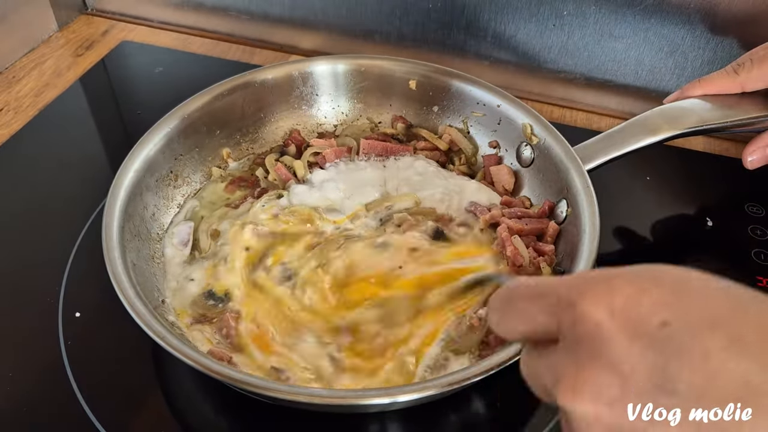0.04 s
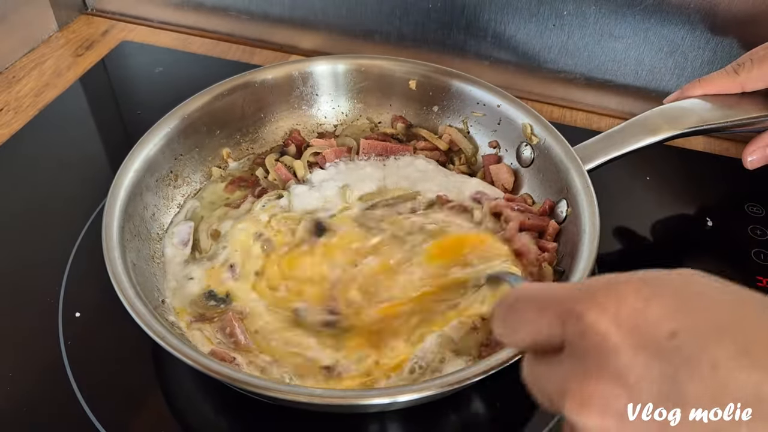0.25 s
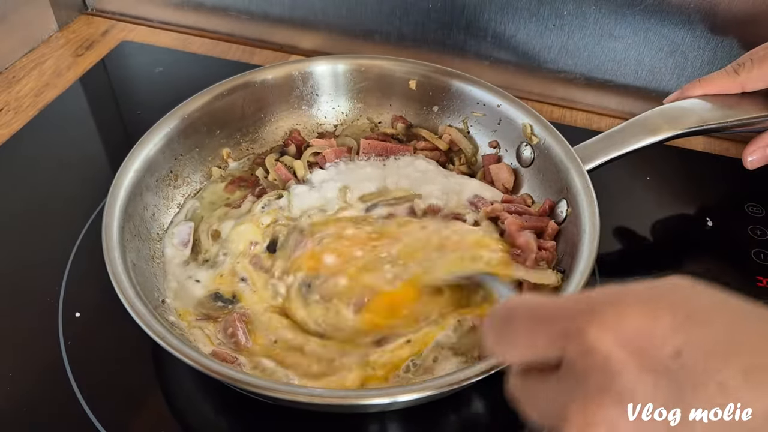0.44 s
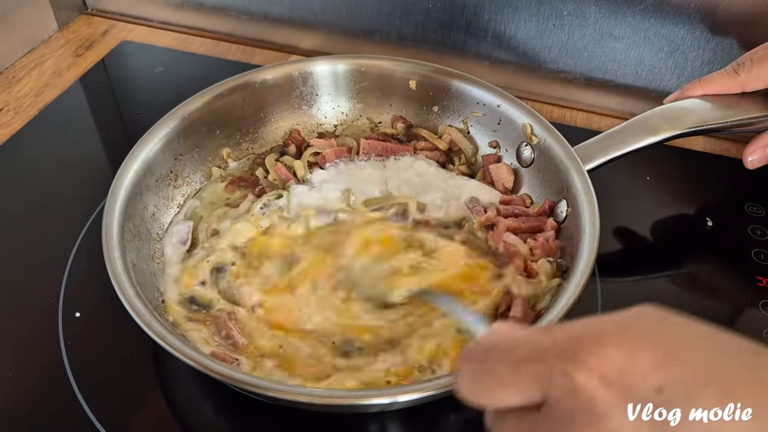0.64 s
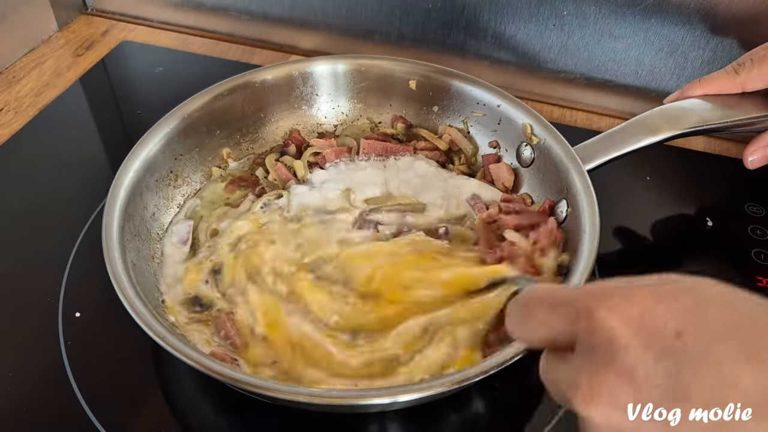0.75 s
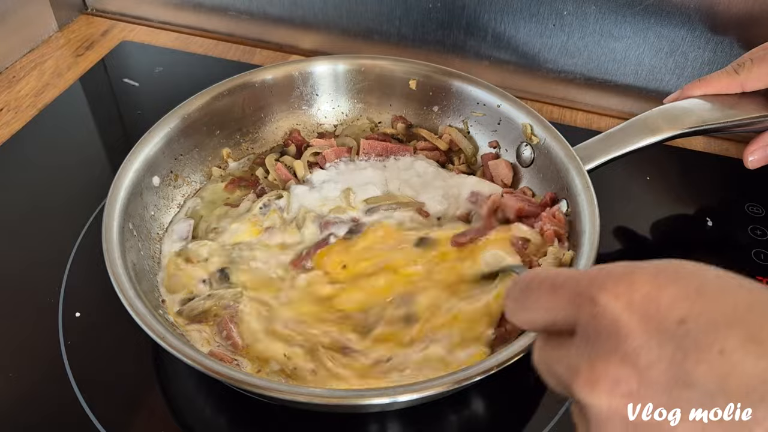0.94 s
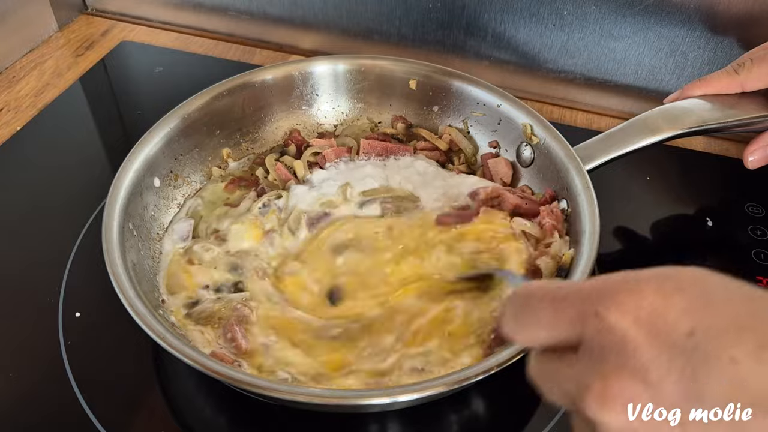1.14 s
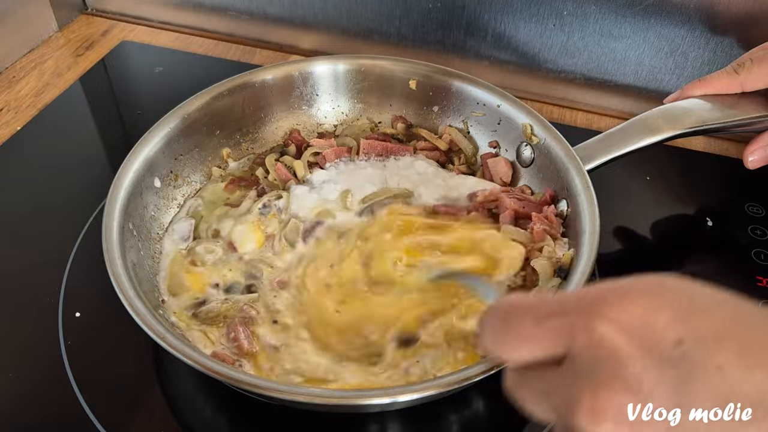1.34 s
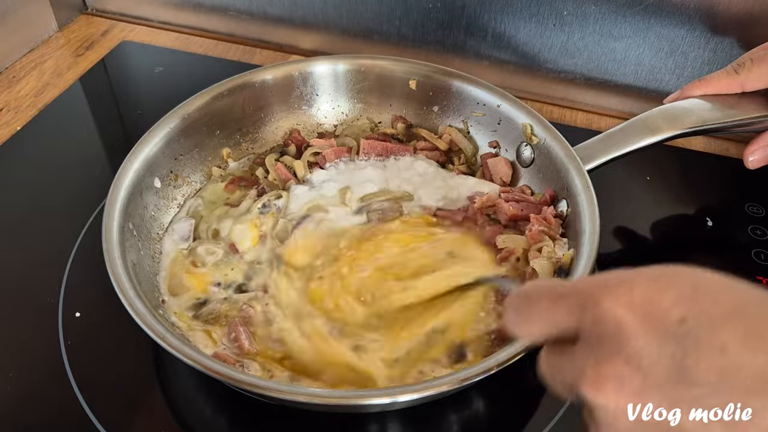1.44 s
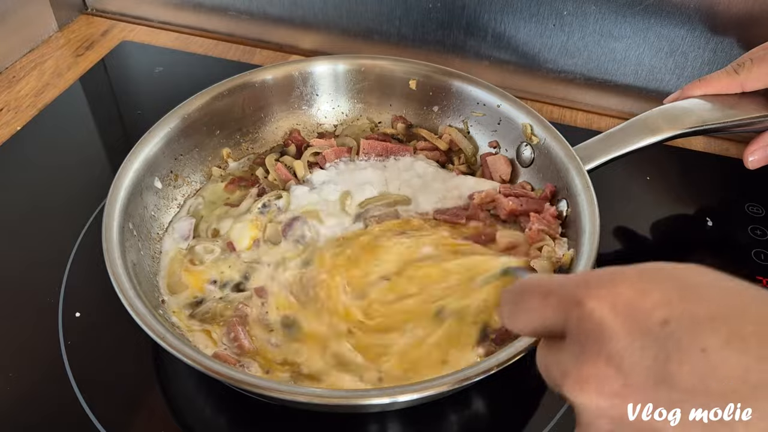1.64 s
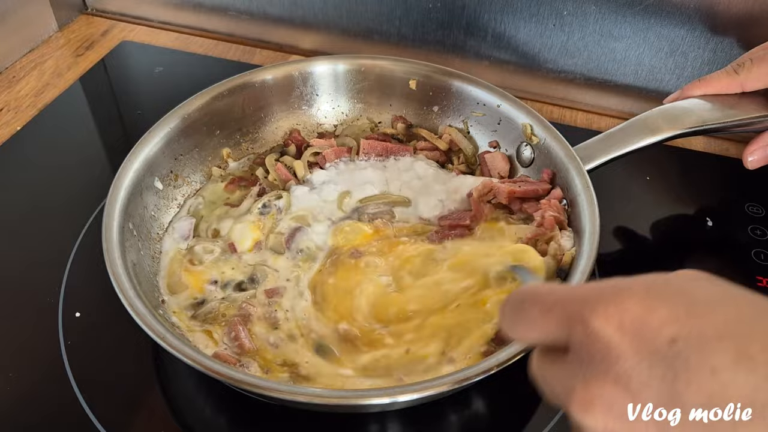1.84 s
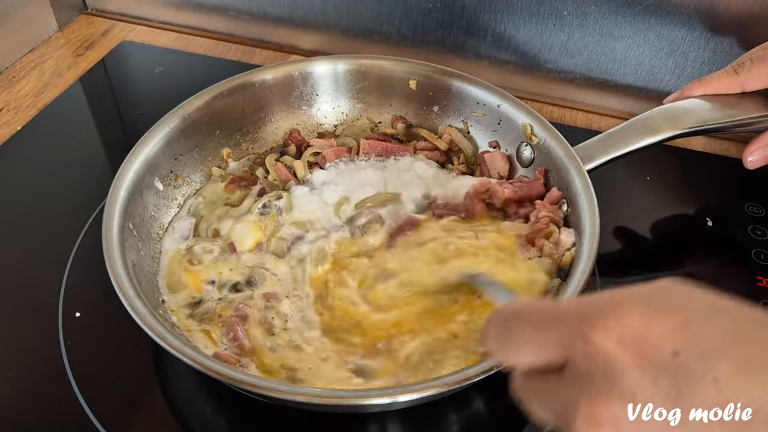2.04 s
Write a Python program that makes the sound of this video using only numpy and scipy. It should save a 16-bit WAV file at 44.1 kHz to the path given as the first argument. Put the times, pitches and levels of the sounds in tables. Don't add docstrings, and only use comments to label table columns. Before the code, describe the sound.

A fork beats eggs in a steel frying pan, heard close in a lightly reverberant kitchen with soft low hum. A fading scrape, ticks and a plop lead to a weak tap at 0.2 s. From 0.4 s, sharp metallic clacks come about every 0.18 s, each with short pan ring, dull thump, wet rasp and rising swish. Small plops and ticks fill gaps; the last stroke near 2 s is softer.

```python
import sys
import numpy as np
from scipy import signal
from scipy.fft import rfft, irfft
from scipy.io import wavfile
from scipy.ndimage import uniform_filter1d

SR = 44100
rng = np.random.default_rng(int(sys.argv[2]) if len(sys.argv) > 2 else 0)


def volts_from_db(level):
    exponent = np.asarray(level, float) / 20
    return 10 ** exponent


def inscribe(sig):
    pcm = np.round(np.clip(np.atleast_2d(sig).T, -1, 1) * 32767)
    wavfile.write(sys.argv[1], SR, pcm.astype(np.int16))


N = 92610

# pitch_hz, level_db
HUM_SPECTRUM = [(15, -64), (25, 5), (114, 3.5), (503, -26.5), (936, -17), (1190, -16), (2220, -15),
                (9320, -32.5), (16000, -59)]
# pitch_hz, likeness_0_to_1
HUM_LIKENESS = [(60, 0.96), (400, 0.39), (2000, 0.062), (12000, 0.57)]
# start_s, drag_db, lift_delay_s, lift_db, fizz_db
DRAGS = [(0.0, -57.5, 0.04, -65, -60), (.195, -60.5, 0.0036, -50.5, -60.5),
         (.396, -37.5, 0.035, -41, -37.5), (.575, -41.5, 0.015, -72, -35), (.753, -38, 0.018, -41, -39),
         (.916, -32.5, 0.04, -46, -37), (1.1, -36.5, 0.034, -37, -37), (1.282, -38.5, 0.041, -45, -37.5),
         (1.457, -39, 0.04, -57, -36.5), (1.631, -38.5, 0.047, -56, -42), (1.806, -36, 0.037, -51.5, -43),
         (1.983, -43.5, 0.029, -45, -63)]
# pitch_hz, level_db
RASP_SPECTRUM = [(900, -33), (1700, -16.5), (2300, -1), (5500, 1), (6500, -26), (9000, -22)]
# pitch_hz, level_db
FIZZ_SPECTRUM = [(3000, -26), (6500, 4), (10500, -3.5), (12500, -8.5), (16000, -9)]
# pitch_hz, level_db, t60_s
PAN_MODES = [(2274, 4, 0.12), (2346, -8.5, 0.12), (2490, -83, 0.0087), (2600, -19, 0.042), (2850, -4, 0.15),
             (3193, -6.5, 0.15), (4096, -1.5, 0.016), (4510, -2, 0.078), (4490, 0, 0.11),
             (4720, 5.5, 0.049), (5094, -5.5, 0.05), (6350, -7, 0.03), (7940, -20, 0.028),
             (11950, -20, 0.07)]
# start_s, thump_db, sway_db, sway_length_s
SHAKES = [(0.031, -35, -38, 0.1), (0.206, -28.5, -32.5, 0.073), (0.398, -27, -41, 0.17),
          (0.575, -29, -46, 0.23), (0.752, -35.5, -56, 0.032), (0.911, -29, -41, 0.14),
          (1.099, -29, -44.5, 0.23), (1.279, -31, -49.5, 0.32), (1.457, -28, -42, 0.064),
          (1.634, -34, -48.5, 0.12), (1.807, -35, -50.5, 0.1), (1.985, -40, -49, 0.041)]
# start_s, peak_db, centre_hz
TICKS = [(.102, -45, 6900), (.245, -52.5, 12000), (.281, -52.5, 9100), (.301, -53.5, 7100),
         (.335, -45, 3070), (.37, -42, 11000), (.386, -33.5, 7300), (.712, -42, 11800), (.841, -59, 4030),
         (.893, -29, 5150), (1.076, -33.5, 5200), (1.673, -44, 4840), (2.04, -48.5, 7450),
         (2.081, -44.5, 4940)]
# start_s, peak_db, pitch_hz
PLOPS = [(.116, -38, 1480), (.322, -31.5, 1420), (.322, -37, 457), (.496, -33, 1490), (.497, -38, 406),
         (.599, -27.5, 2007), (.672, -41.5, 1580), (.686, -52, 2240), (.707, -39.5, 2000),
         (1.208, -45, 1515), (1.402, -44.5, 1380), (1.586, -42.5, 1490), (.841, -29.5, 2080),
         (.893, -30.5, 1483), (1.253, -40.5, 1500), (1.753, -28, 3580), (2.082, -39, 2170)]
# start_s, peak_db, treble_db, low_mode_db
STRIKES = [(0.1905, -32, -14, 2.5), (0.3947, -7.5, -6, -9.5), (0.5734, -9, 3, -6), (0.7508, -12, -2, -6),
           (0.913, -6, -1, 1), (1.0982, -4, -7, -0.5), (1.28, -11.5, 3, 3.5), (1.455, -9, 1.5, 1.5),
           (1.6299, -12.5, 4.5, 3), (1.8047, -11, -3.5, 2.5), (1.9822, -18, -15, 6)]
# pitch_hz, level_db
CRACK_SPECTRUM = [(180, -117), (300, -39), (1580, 5), (2140, 21.5), (4590, 14), (12100, -19),
                  (16000, -19.5)]
# start_s, peak_db, pitch_hz, t60_s
BONKS = [(0.198, -5, 815, 0.01), (0.261, -29, 850, 0.04), (0.395, -17.5, 751, 0.036),
         (0.574, -37, 585, 0.094), (0.661, -29, 760, 0.033), (0.674, -32, 790, 0.028),
         (1.39, -34, 793, 0.059), (0.731, -35.5, 729, 0.094), (0.752, -19, 802, 0.045),
         (0.876, -30.5, 916, 0.083), (0.916, -7, 911, 0.046), (1.07, -27.5, 773, 0.075),
         (1.099, -17, 807, 0.027), (1.281, -23.5, 794.5, 0.055), (1.391, -39, 1004, 0.14),
         (1.457, -15.5, 857, 0.032), (1.585, -46, 754, 0.1), (1.631, -16, 903, 0.04),
         (1.806, -22, 783, 0.042), (1.829, -32, 994, 0.079), (1.985, -23, 925, 0.03),
         (2.086, -46, 940, 0.084)]
# start_s, peak_db, pitch_hz
CLANKS = [(.396, -14, 2990), (.396, -11, 4010), (.396, -19, 4880), (.397, -17, 4730), (.396, -23, 6450),
          (.5745, -18, 4720), (.5745, -23, 5200), (.578, -13, 5440), (.578, -14, 4570),
          (.7515, -12.5, 4670), (.7515, -31, 5100), (.7515, -22, 4000), (.9145, -10, 2168),
          (.9145, -11, 2887), (.9145, -11.5, 4650), (1.0995, -10, 2140), (1.0995, -20, 4630),
          (1.0995, -45, 2900), (1.0995, -35, 4170), (1.0995, -31, 5440), (1.0995, -23, 11800),
          (1.2815, -15.5, 2260), (1.2815, -23, 3037), (1.2815, -15.5, 4050), (1.282, -10, 4540),
          (1.282, -24, 4330), (.915, -21, 1895), (1.983, -33, 3900), (1.2815, -15, 5320),
          (1.4565, -18.5, 2267), (1.4565, -23, 2943), (1.4565, -19, 3900), (1.4565, -23, 4250),
          (1.4565, -26.5, 3230), (.263, -39.5, 543), (1.4565, -23, 4600), (1.6305, -13, 2215),
          (1.6305, -15, 4680), (1.6305, -14.5, 3210), (1.6305, -17, 3895), (1.806, -21, 2204),
          (1.806, -14, 3086), (1.806, -22, 4320), (1.806, -24, 4830), (1.806, -20.5, 4930)]
# middle_s, level_db, centre_hz, half_length_s
CATCHES = [
    (.44, -52, 4700, 0.0071),
    (.64, -46, 5160, 0.0059),
    (.79, -49, 5200, .01),
    (1.14, -42, 4600, 0.0061),
    (1.32, -41, 5130, 0.0087),
    (1.485, -41, 4800, 0.011),
    (1.675, -31, 4900, .0015),
    (1.685, -40, 5000, 0.0074),
    (1.85, -47, 4220, 0.0094),
    (2.02, -46, 5140, 0.0097),
]

HUM_DB = -52
DRAG_T60_S, LINGER_DB, LINGER_T60_S = 0.2, -5, 0.74
LIFT_RISE_S, LIFT_FALL_S = 0.013, 0.012
SWISH_FROM_HZ, SWISH_TO_HZ, SWISH_WIDTH_HZ, SWISH_DB = 3600, 8000, 600, -1
FIZZ_PAST_S, FIZZ_EDGE_S, FIZZ_REST_DB, FROTH_DB = 0.027, 0.0047, -10.5, 0
SLIPS_PER_S, SLIP_SPREAD_DB = 6600, 3.5
SLIP_DETUNE, SLIP_T60_S, RASP_RING_DB = .02, .035, -6
RASP_BOWL_DB, BOWL_HZ = -11, 878
MODE_SCATTER_DB, MODE_DETUNE, DAMPED_T60_S = 2.5, .012, .035
ROOM_DB, ROOM_T60_S, ROOM_TREBLE_HZ = -15.5, 0.29, 6400
THUMP_HZ, THUMP_T60_S, SWAY_HZ = 109, .05, 46.55
TICK_T60_S = 0.07
PLOP_CYCLES, PUFF_WIDTH, PUFF_DB = 67, .35, -1
CRACK_DB, CRACK_T60_S, THIN_HZ = 3, .032, 1950
CLANK_T60_S, CLANK_RISE_S = 0.026, 0.00084
CATCH_WIDTH_HZ = 700
SPREAD_DB, LEFT_DB, LEFT_LAG_S = -3, 2.2, -.00008
EDGE_HZ = 15950


def evened(x):
    return x / np.sqrt(np.mean(x ** 2) + 1e-20)


def read(points, hz):
    f, value = np.transpose(points)
    return np.interp(np.log(hz + 1), np.log(f + 1), value)


def add(mix, start_s, sound):
    part = mix[max(round(start_s * SR), 0):][:len(sound)]
    part += sound[:len(part)]


def colour(x, points, treble_db=0):
    hz = np.fft.rfftfreq(len(x), 1 / SR)
    shelf_db = treble_db / (1 + (6500 / (hz + 1)) ** 4)
    return irfft(rfft(x) * volts_from_db(read(points, hz) + shelf_db), len(x))


def resonate(x, hz, width_hz):
    turn = np.exp(2j * np.pi * np.cumsum(hz * np.ones(len(x))) / SR)
    r = np.exp(-np.pi * width_hz / SR)
    return 2 * (turn * signal.lfilter([1 - r], [1, -r], x / turn)).real


def ring(t, hz, db, t60_s, rise_s=.0004):
    return volts_from_db(db - 60 * t / t60_s) * (1 - np.exp(-t / rise_s)) * np.sin(2 * np.pi * hz * t)


def hum():
    frames, hz = N // 256 + 5, np.fft.rfftfreq(1024, 1 / SR)
    a, b, c, d, patches = rng.standard_normal((frames, 513, 5)).T
    patches = evened(uniform_filter1d(uniform_filter1d(patches, 14, 0), 8, 1))
    same = np.clip(read(HUM_LIKENESS, hz), -1, 1)[:, None]
    left = a + 1j * b
    right = same * left + np.sqrt(1 - same ** 2) * (c + 1j * d)
    z = np.array([left, right]) * volts_from_db(read(HUM_SPECTRUM, hz)[:, None] + 3.8 * patches)
    return volts_from_db(HUM_DB) * evened(signal.istft(z, nperseg=1024, noverlap=768)[1][:, :N])


def slips(size):
    luck = rng.random((4, size))
    clumps = volts_from_db(3.3 * evened(uniform_filter1d(luck[3] - .5, size=300)))
    clicks = (luck[0] < SLIPS_PER_S / SR) * np.sign(luck[1] - .5)
    return evened(clumps * clicks * volts_from_db(-SLIP_SPREAD_DB * np.log(luck[2] + 0.18)))


def steel(treble_db, low_db=0, detune=MODE_DETUNE, longest_s=DAMPED_T60_S):
    t, out = np.arange(6000) / SR, np.zeros(6000)
    luck = rng.standard_normal((len(PAN_MODES), 2))
    for (hz, db, t60_s), (a, b) in zip(PAN_MODES, luck):
        level_db = db + MODE_SCATTER_DB * a + treble_db * (hz > 6500) + low_db * (hz < 3500)
        out += ring(t, hz * (1 + detune * b), level_db, min(t60_s, longest_s), .0001)
    return out


def drag(start_s, drag_db, delay_s, lift_db, fizz_db):
    n = 14000
    t = np.arange(n) / SR
    late = t - delay_s
    lift = volts_from_db(lift_db) * np.exp(-.5 * (late / np.where(late < 0, LIFT_RISE_S, LIFT_FALL_S)) ** 2)
    linger = volts_from_db(LINGER_DB - 60 * t / LINGER_T60_S)
    slide = volts_from_db(drag_db) * (volts_from_db(-60 * t / DRAG_T60_S) + linger)
    fizzing = 1 / (1 + np.exp((late - FIZZ_PAST_S) / FIZZ_EDGE_S))
    wet = volts_from_db(fizz_db) * (fizzing + volts_from_db(FIZZ_REST_DB - 60 * t / LINGER_T60_S))

    rasp = (slide + lift) * evened(colour(slips(n), RASP_SPECTRUM))
    body = steel(0, 0, SLIP_DETUNE, SLIP_T60_S)
    rung = signal.fftconvolve(slips(n) * (slide + lift), body / np.linalg.norm(body))[:n]
    bowl = slide * evened(resonate(resonate(slips(n), BOWL_HZ, 210), BOWL_HZ, 190))
    progress = np.clip(t / (delay_s + .012), 0, 1) ** 2.5
    glide_hz = SWISH_FROM_HZ * (SWISH_TO_HZ / SWISH_FROM_HZ) ** progress
    swish = (lift + .5 * slide * (late < 0)) * evened(resonate(slips(n), glide_hz, SWISH_WIDTH_HZ))
    froth = slips(n) + volts_from_db(FROTH_DB) * rng.standard_normal(n)
    fizz = (wet + .5 * lift) * evened(colour(froth, FIZZ_SPECTRUM))
    return start_s, rasp + volts_from_db(RASP_RING_DB) * rung + volts_from_db(RASP_BOWL_DB) * bowl + volts_from_db(SWISH_DB) * swish + fizz


def kitchen(x):
    taps, t = np.zeros((2, 20000)), np.arange(20000) / SR
    at = np.arange(200, 19960, 20) + rng.integers(0, 20, (2, 988))
    np.put_along_axis(taps, at, rng.choice([-1., 1.], at.shape), 1)
    taps = signal.lfilter(*signal.butter(1, ROOM_TREBLE_HZ, fs=SR), taps * volts_from_db(-60 * t / ROOM_T60_S))
    taps = signal.lfilter(*signal.butter(2, 400, "high", fs=SR), taps)
    taps *= volts_from_db(ROOM_DB) / np.linalg.norm(taps[0])
    return signal.fftconvolve(x[None], taps, axes=1)[:, :N]


def shake(start_s, thump_db, sway_db, length_s):
    t = np.arange(12000) / SR
    hold = np.minimum(t / 0.022, 1) * volts_from_db(-30 * t) / (1 + np.exp((t - length_s) / 0.026))
    thump = ring(t, THUMP_HZ, thump_db, THUMP_T60_S, 0.00052)
    overtone = ring(t, 230.6, thump_db - 14.5, 0.058, 0.0029)
    sway = volts_from_db(sway_db) * hold * np.sin(2 * np.pi * SWAY_HZ * t)
    return start_s, thump + overtone - sway


def tick(start_s, db, hz):
    t = np.arange(5000) / SR
    grit = rng.standard_normal(len(t))
    crackle = evened(resonate(resonate(grit, hz, hz * 1.14), hz, hz))
    return start_s, crackle * volts_from_db(db - 60 * t / TICK_T60_S) * (1 - np.exp(-t / 0.00042))


def plop(start_s, db, hz):
    t, t60_s = np.arange(6000) / SR, min(PLOP_CYCLES / hz, .06)
    tone = ring(t, hz * (1 + 1.5 * t), db, t60_s, .001)
    puff = evened(resonate(slips(len(t)), hz, hz * PUFF_WIDTH)) * volts_from_db(db + PUFF_DB - 60 * t / t60_s)
    return start_s, tone + puff * (1 - np.exp(-t / 0.003))


def strike(start_s, db, treble_db, low_db):
    out, t = np.zeros(7000), np.arange(6000) / SR
    for k, force in enumerate((.5, 1, .8, .5)):
        crack = evened(colour(rng.standard_normal(6000), CRACK_SPECTRUM, treble_db + 43.5))
        crack *= volts_from_db(CRACK_DB - 60 * t / CRACK_T60_S)
        add(out, .0022 * k / 3, force * (crack + steel(treble_db + 15, low_db)))
    out = signal.lfilter(*signal.butter(2, THIN_HZ, "high", fs=SR), out)
    return start_s, volts_from_db(db) * out / abs(out).max()


def bonk(start_s, db, hz, t60_s):
    t = np.arange(8000) / SR
    mode = ring(t, hz, db, t60_s, 0.0037)
    neighbour = ring(t, hz * 1.09, db - 10, t60_s, 0.0044)
    knock = ring(t, hz * 0.79, db - 70.5, 0.002, 0.00048)
    return start_s, mode + neighbour + knock


def clank(start_s, db, hz):
    return start_s, ring(np.arange(3000) / SR, hz, db, CLANK_T60_S, CLANK_RISE_S)


def catch(middle_s, db, hz, half_s):
    t = np.arange(4000) / SR
    grit = evened(resonate(slips(len(t)), hz, CATCH_WIDTH_HZ))
    swell = np.exp(-.5 * ((t - 2 * half_s) / half_s) ** 2)
    return middle_s - 2 * half_s, volts_from_db(db) * swell * grit


def scene():
    near, uneven, low = np.zeros((3, N))
    voices = ((DRAGS, drag), (TICKS, tick), (PLOPS, plop), (STRIKES, strike),
              (BONKS, bonk), (CLANKS, clank), (CATCHES, catch))
    for rows, voice in voices:
        for row in rows:
            start_s, sound = voice(*row)
            smear = rng.standard_normal(41) * np.hanning(41)
            smear = smear - smear[::-1]
            add(near, start_s, sound)
            add(uneven, start_s, signal.fftconvolve(sound, smear / np.linalg.norm(smear), "same"))
    for row in SHAKES:
        add(low, *shake(*row))
    uneven = volts_from_db(SPREAD_DB) * signal.filtfilt(*signal.butter(1, 500, "high", fs=SR), uneven)
    lag = np.exp(-2j * np.pi * np.fft.rfftfreq(N, 1 / SR) * LEFT_LAG_S)
    left = irfft(rfft(near + uneven) * lag, N)
    pan = np.array([left * volts_from_db(LEFT_DB / 2), (near - uneven) * volts_from_db(-LEFT_DB / 2)])
    hob = low * volts_from_db(np.array([[.6], [-.6]]))
    return pan + kitchen(near) + hob + hum()


def band_limit(x):
    return signal.sosfilt(signal.butter(12, 17010, fs=SR, output="sos"), x)


def record(dry):
    lowpass = signal.firwin(255, EDGE_HZ, window=("kaiser", 9), fs=SR)
    mix = signal.oaconvolve(dry, lowpass[None], "same")
    return band_limit(mix)


dry = scene()
out = record(dry)
inscribe(out)
```